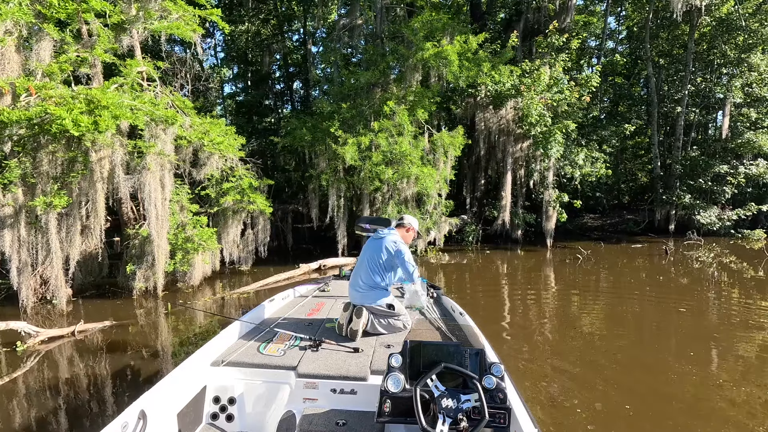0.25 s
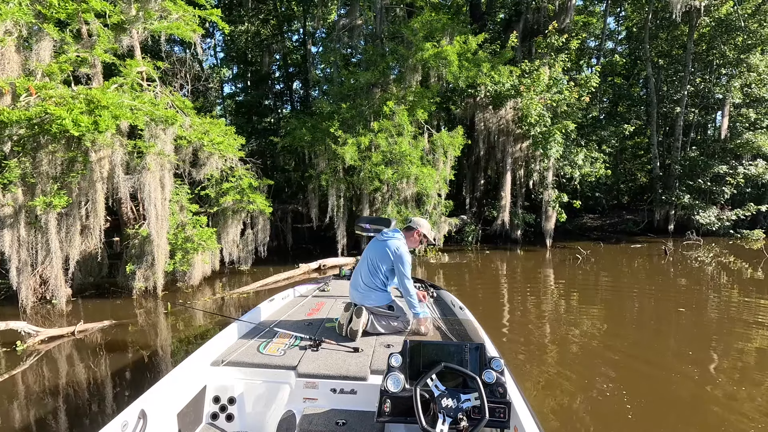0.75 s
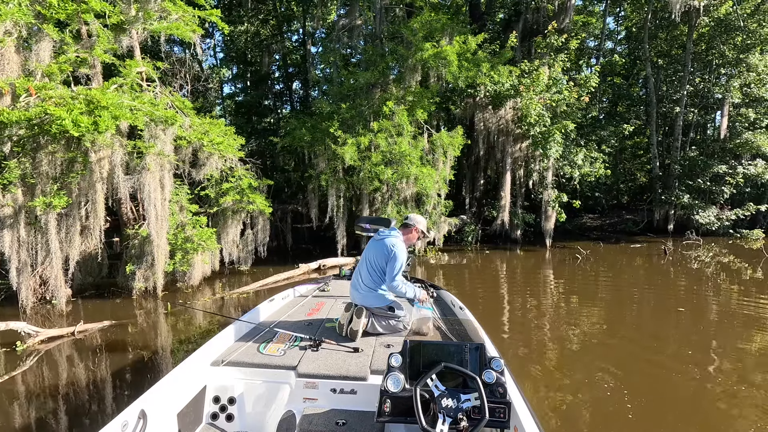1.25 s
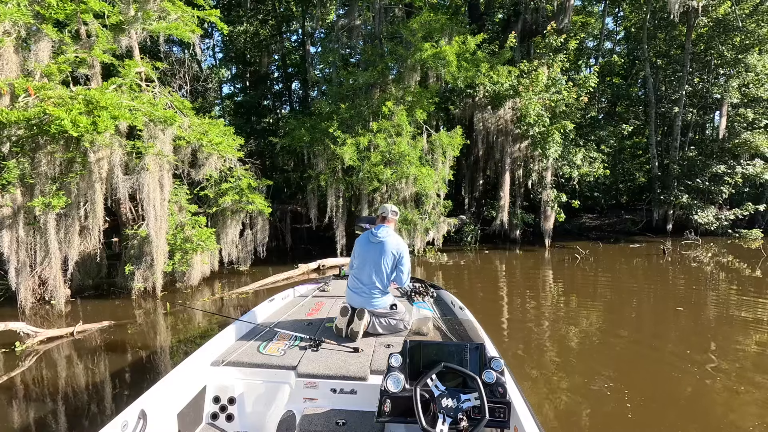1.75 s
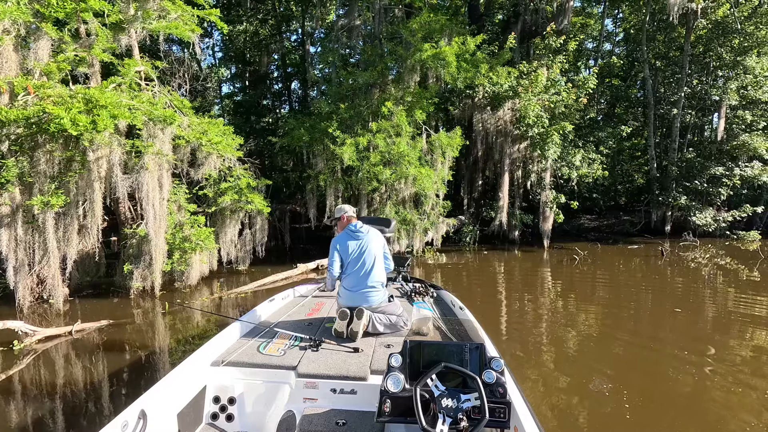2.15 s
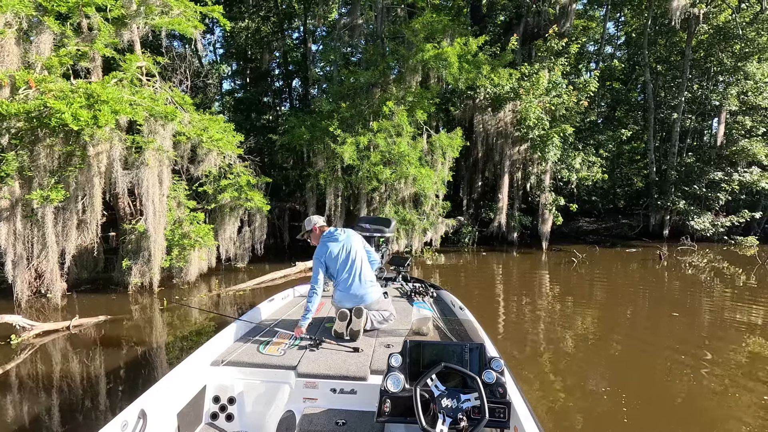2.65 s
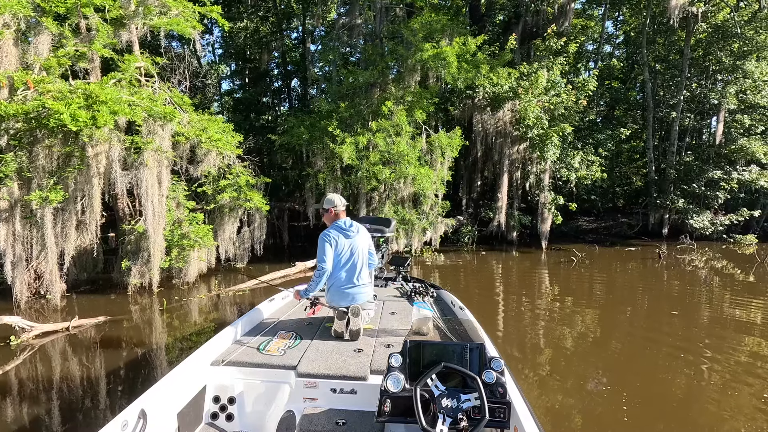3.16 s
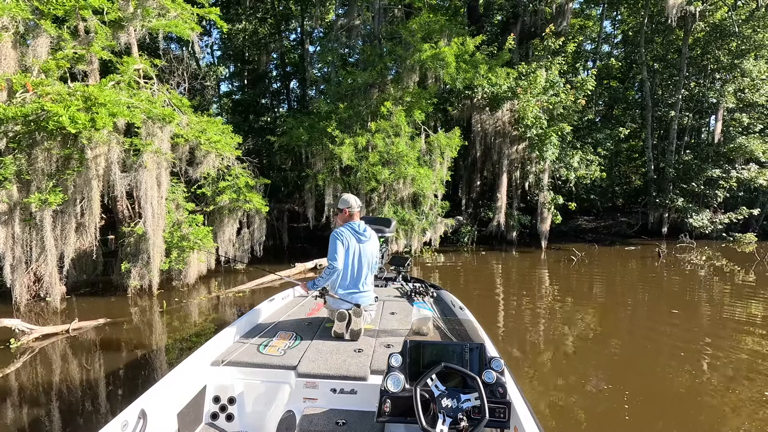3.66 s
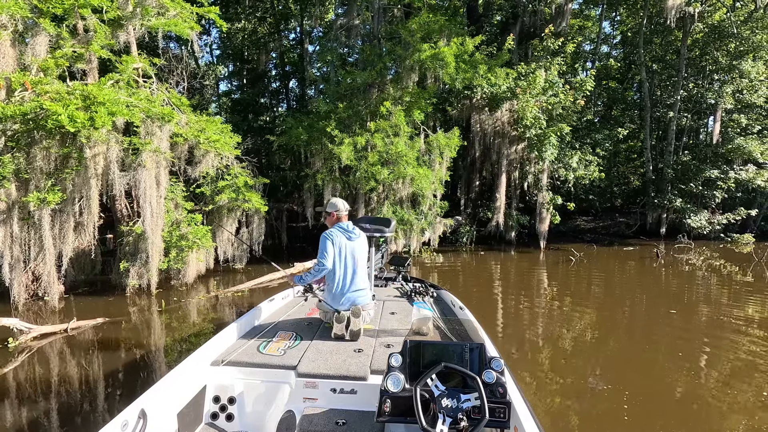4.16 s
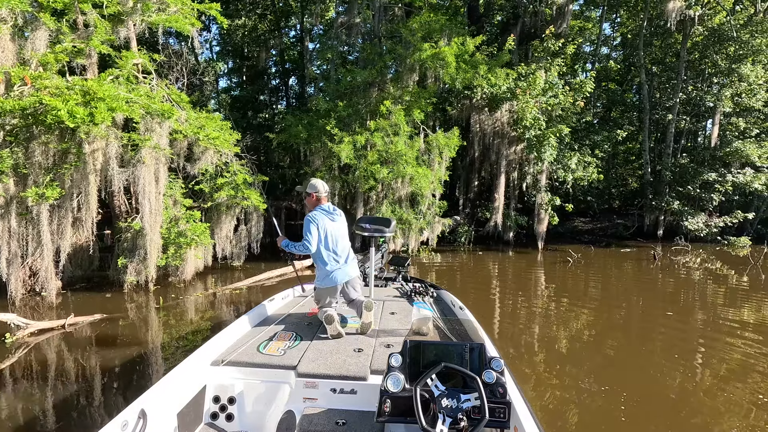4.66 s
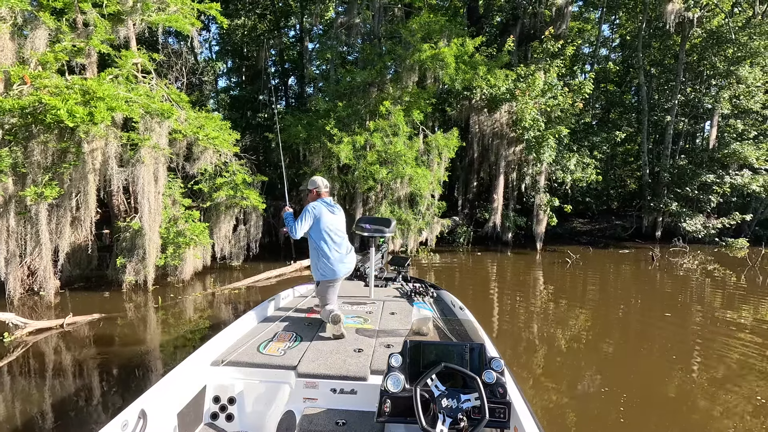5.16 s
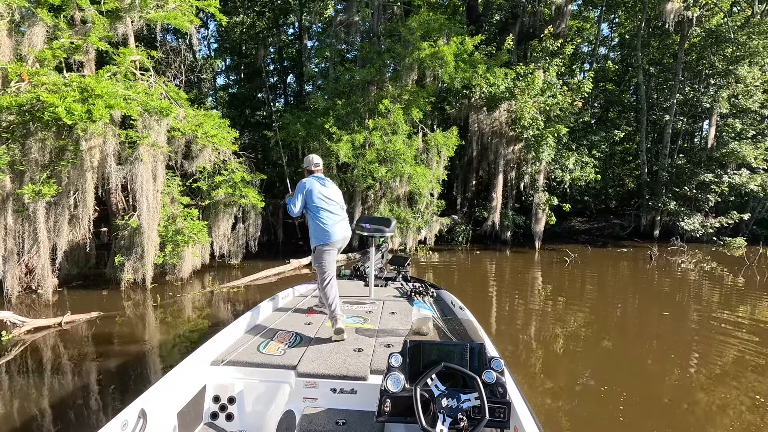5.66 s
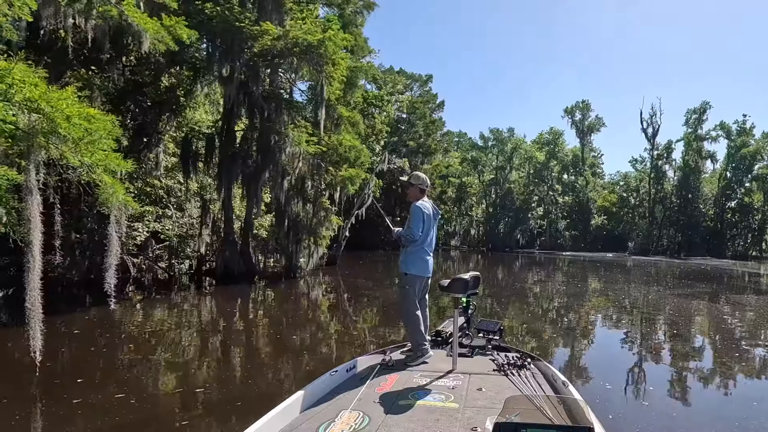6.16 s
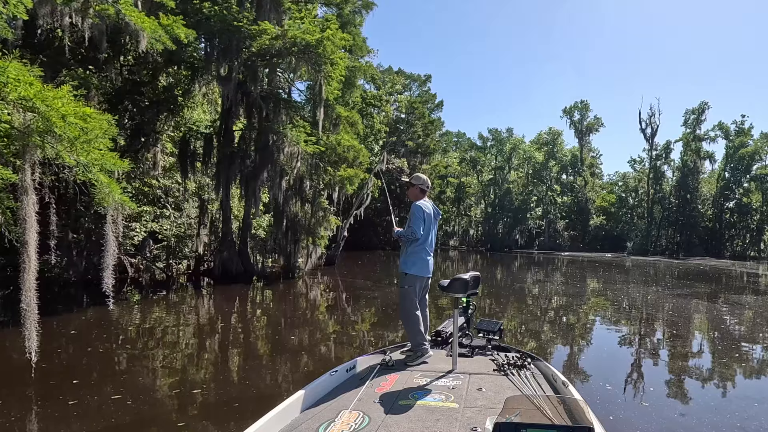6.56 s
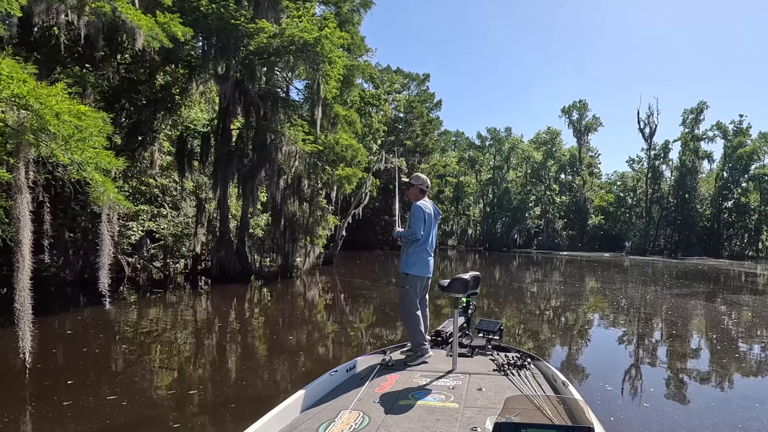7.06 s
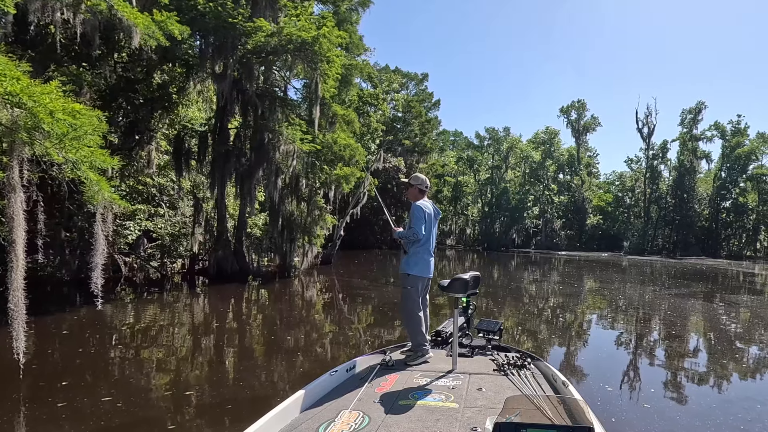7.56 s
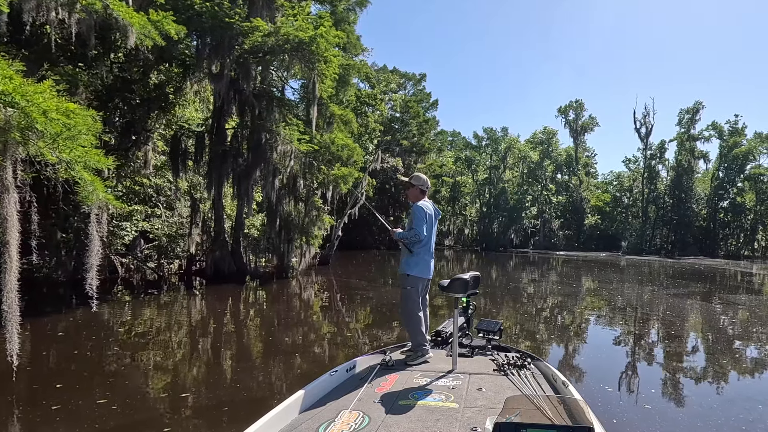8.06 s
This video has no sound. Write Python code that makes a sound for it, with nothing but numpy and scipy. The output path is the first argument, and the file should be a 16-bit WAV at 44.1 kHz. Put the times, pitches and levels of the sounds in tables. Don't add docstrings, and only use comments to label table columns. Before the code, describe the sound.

Birds whistle and trill over a steady insect drone and low wind rumble while cloth and tackle rustle on a boat deck, then one heavy step thuds.

```python
import sys
import numpy as np
from scipy import signal
from scipy.io import wavfile
from scipy.ndimage import uniform_filter1d

SR = 44100
rng = np.random.default_rng(int(sys.argv[2]) if len(sys.argv) > 2 else 0)


def unload_audio(sound):
    columns = np.transpose(np.atleast_2d(sound))
    steps = np.round(np.clip(columns, -1, 1) * 32767)
    wavfile.write(sys.argv[1], SR, steps.astype(np.int16))


def field_ratio(decibels):
    return 10 ** (np.asarray(decibels, dtype=float) / 20)


N = 366912
T = np.arange(N) / SR
CUT_S = 6.2


def rms_one(x):
    return x / np.sqrt(np.mean(x ** 2) + 1e-20)


def in_time(tables):
    s, *columns = np.concatenate(tables).T
    return [np.interp(T, s, column) for column in columns]


def at_hz(points, hz):
    table_hz, db = np.array(points).T
    return np.interp(np.log(hz), np.log(table_hz), db)


def drift(rate):
    r = np.exp(-80 * np.pi * rate / SR)
    white = rng.standard_normal(N // 40 + 2002)
    slow = rms_one(signal.lfilter([1], [1, -2 * r, r * r], white)[2000:])
    return np.interp(np.arange(N) / 40, np.arange(len(slow)), slow)


def band(x, low_hz, high_hz, order=2):
    sos = signal.butter(order, [low_hz, high_hz], "band", fs=SR, output="sos")
    return signal.sosfilt(sos, x)


def ring(clicks, hz, t60):
    r, w = field_ratio(-60 / (t60 * SR)), 2 * np.pi * hz / SR
    return signal.lfilter([0, np.sin(w)], [1, -2 * r * np.cos(w), r * r], clicks + 1e-18)


def pair(mid, side, alike):
    alike = np.clip(alike, 0, 1)
    difference = np.sqrt(1 - alike) * side * np.array([[1], [-1]])
    return (np.sqrt(1 + alike) * mid + difference) / np.sqrt(2)


def pan(x, left_db):
    return x * field_ratio(left_db / 2 * np.array([[1], [-1]]))


def evened(x):
    return rms_one(x / uniform_filter1d(x[0] ** 2, size=5000) ** .35)


# (pitch [Hz], likeness [0 to 1])
SIDE_LIKENESS = [(200, 0.089), (500, 0.12), (1000, 0.17), (2000, 0.21), (4000, 0.93), (8000, 0.68)]
# (pitch [Hz], left over right [dB])
SIDE_LEAN = [(150, -1), (300, -6), (600, -6), (1200, -1.5), (2500, 2), (5000, 2)]


def coloured(white, gains_db, low_hz=180):
    out, edges = 0, low_hz * 2 ** np.arange(0, 6.6, .5)
    for k, (low, high) in enumerate(zip(edges, edges[1:])):
        hz = np.sqrt(low * high)
        noise = pair(*band(white[k % 2], low, high), at_hz(SIDE_LIKENESS, hz))
        out = out + field_ratio(gains_db(hz)) * pan(noise, at_hz(SIDE_LEAN, hz))
    return out


# (pitch [Hz], level per Hz [dB])
SHADE = [(180, -2.5), (260, -15.5), (700, -22), (950, -28), (1200, -17.5), (2100, -28), (3100, -24.5),
         (4500, -27.5), (6200, -25.5), (8500, -37), (10500, -39.5), (12500, -51), (15000, -61.5)]
# (pitch [Hz], level per Hz [dB])
OPEN = [(180, 0), (300, -13.5), (600, -15.5), (950, -21.5), (1200, -12), (1800, -17), (2700, -16),
        (3700, -33), (5300, -13), (6900, -29), (8500, -53), (11000, -59), (15000, -78)]


def air():
    def gains_db(hz):
        shade_db, open_db = -66 + at_hz(SHADE, hz), -72 + at_hz(OPEN, hz)
        return np.where(T < CUT_S, shade_db, open_db) + 2.7 * drift(4.5)
    floor = pan(coloured(rng.standard_normal((2, 2, N)), gains_db) * field_ratio(25.0), -0.68)
    return signal.sosfilt(signal.butter(6, 13500, fs=SR, output="sos"), floor)


# (time [s], level [dB])
INSECT_LEVEL = [
    [(0, -60), (.8, -58.5), (1.66, -58.5)],
    [(2.15, -58), (3, -57.5), (4, -58.5), (4.8, -59.5), (5.45, -56), (5.8, -58.5), (6.19, -57.5)],
    [(6.21, -71.5), (6.6, -72), (7.25, -67.5), (8.32, -68)],
]
# (pitch [Hz], width [Hz], level [dB])
INSECT_MODES = [(4210, 320, -5), (4468, 370, 0.5), (4790, 440, -1.5), (5260, 470, -6), (5950, 350, -22)]


def chorus():
    clicks = (rng.random((2, N)) < 2500 / SR) * rng.standard_normal((2, N))
    out = 0
    for k, (hz, width_hz, db) in enumerate(INSECT_MODES):
        shell = band(np.roll(clicks, 3001 * k, axis=1), hz - width_hz / 2, hz + width_hz / 2)
        out = out + field_ratio(db + 1.0 * drift(4.3)) * rms_one(shell)
    return field_ratio(in_time(INSECT_LEVEL)[0]) * rms_one(pair(*out, 0.58))


# (time [s], level [dB])
WIND = [
    [(0.0, -39.5), (0.018, -57.5), (0.296, -51.5), (0.33, -62.5), (0.496, -52), (0.9, -55), (1.25, -56),
     (1.64, -52.5)],
    [(2.17, -52), (2.9, -52.5), (3.3, -56.5), (4.3, -53), (5.06, -52)],
    [(5.3, -50.5), (5.75, -56.5), (6.5, -52), (7.4, -54), (8.3, -52.5)],
]
# (middle [s], length [s], level over the wind [dB])
PUFFS = [(2.45, .2, -4), (3.053, 0.29, 5), (3.7, 0.13, 5), (3.83, .06, 1), (4.023, 0.11, 6.5),
         (4.762, 0.17, 8.5), (5.92, 0.13, 5), (6.06, .08, -8), (6.249, 0.29, 7), (6.519, .14, 5.5),
         (6.681, 0.19, 6.5), (6.83, 0.11, -8), (7.134, 0.34, 5), (7.456, 0.12, 3), (7.75, 0.13, 3.5)]


def rumble():
    gust_db = in_time(WIND)[0] + 52.5
    for s, length, db in PUFFS:
        gust_db += db * np.cos(np.pi * np.clip((T - s) / length, -.5, .5)) ** 2
    white = rng.standard_normal((4, N))
    deep = evened(band(white[:2], 30, 78.0))
    deep = deep * field_ratio(-50.5 + gust_db + 1.0 * drift(6))
    upper = evened(band(band(white[2:], 87, 170.0), 56, 240))
    upper = upper * field_ratio(-59 + 0.3 * gust_db + 2.2 * drift(5.0))
    return pair(*deep, .985) + pair(*upper, 0.87)


# (start [s], length [s], level [dB], extra level of the bright top [dB])
RUBS = [(-.06, 0.18, -52, -22), (0.094, 0.098, -52.5, -26), (0.168, .11, -56, -25), (0.238, 0.27, -66, -38),
        (.5, 0.28, -69, -39.5), (0.34, 0.058, -67.5, -31), (0.47, 0.079, -55.5, -19),
        (0.542, 0.12, -63.5, -26), (.76, .36, -73, -45), (0.769, 0.045, -64, -27),
        (1.069, 0.08, -64.5, -43), (1.144, 0.073, -59.5, -40), (1.201, 0.11, -65, -40),
        (1.34, 0.057, -69, -48), (2.482, 0.25, -66.5, -31), (3.555, 0.26, -65, -33),
        (4.568, 0.051, -67, -31), (4.665, 0.064, -51.5, -6), (4.725, 0.024, -53.5, -16),
        (4.994, 0.11, -72, -47), (5.093, 0.024, -68, -55), (5.828, 0.068, -69, -27)]
# (pitch [Hz], level per Hz [dB])
RUB_COLOUR = [(250, 1), (500, -2.5), (800, -7.5), (1400, 2), (2500, -2.5), (4000, -3.5), (7000, -16),
              (10000, -45), (15000, -67.5)]


def rustle():
    dull, bright = np.zeros((2, N))
    for s, length, db, bright_db in RUBS:
        at = np.arange(max(round(s * SR), 0), round((s + length) * SR))
        stroke = np.abs(np.sin(np.pi * (T[at] - s) / length)) ** .8
        dull[at] += field_ratio(db) * stroke
        bright[at] += field_ratio(db + bright_db) * stroke
    fade = np.exp(-1 / (0.0021 * SR))
    dull, bright = signal.lfilter([1 - fade], [1, -fade], np.array([dull, bright]) + 1e-18)
    grains = rng.standard_normal((2, 2, N)) * field_ratio(2.5 * drift(230) + 1.4 * drift(35))
    grains[:, 1] *= .35
    body = coloured(grains, lambda hz: at_hz(RUB_COLOUR, hz))
    top = pair(*band(grains[:, 0], 4900, 9500), .75) * field_ratio(-2.5)
    return pan(body * field_ratio(11.5) * dull + top * bright, -1.5)


# (time [s], peak of the dull part [dB], peak of the bright part [dB])
TICKS = [(0.0168, -50, -68), (0.0263, -51, -58), (0.052, -55.5, -71.5), (0.1483, -34.5, -73.5),
         (0.2136, -53, -61), (0.2323, -40, -76), (0.358, -58, -70), (0.407, -63, -65), (0.4453, -57, -82),
         (0.4977, -66.5, -61.5), (0.5284, -55.5, -52), (0.5733, -53.5, -60.5), (0.598, -52, -67.5),
         (0.7634, -55.5, -60.5), (0.7955, -49, -70.5), (0.9712, -57.5, -83), (1.097, -62, -85),
         (1.24, -50, -96), (1.3094, -70, -99), (2.2282, -46.5, -76), (2.967, -53, -89), (3.706, -59, -86),
         (4.679, -66, -65), (4.7363, -52, -75), (5.0988, -49, -91), (5.121, -49.5, -92),
         (5.266, -64.5, -88), (5.653, -57, -103), (5.8844, -78, -75), (4.4465, -75, -81),
         (4.7795, -77, -79), (4.8414, -75, -79), (4.868, -78, -79), (5.1971, -74, -83), (5.9055, -75, -79)]
# (pitch [Hz], level [dB], time to die by 60 dB [s])
TICK_MODES = [(616, -7.5, 0.0091), (1280, -4.5, 0.026), (1660, 8.5, 0.0041), (2300, -5.5, .01),
              (3360, -2, 0.015)]


def ticks():
    s, dull_db, bright_db = np.transpose(TICKS)
    at, out = (s * SR).astype(int), np.zeros(N)
    chance = rng.normal(0, 3.5, (len(at), len(TICK_MODES)))
    for k, (hz, db, t60) in enumerate(TICK_MODES):
        clicks = np.zeros(N)
        clicks[at] = field_ratio(dull_db + db - 10.0 + chance[:, k])
        out += ring(clicks, hz, t60)
    cracks = np.zeros(N)
    cracks[at] = field_ratio(bright_db + 21.5)
    fading = signal.lfilter([1], [1, -field_ratio(-60 / (0.0065 * SR))], cracks + 1e-18)
    return pan(out + band(fading * rng.standard_normal(N), 4000, 9500), -1.79)


# (time [s], peak [dB], pitch [Hz])
CRACKLES = [(0.017, -42, 1600), (0.024, -33.5, 1840), (0.043, -35, 3200), (0.051, -40, 1560),
            (0.058, -43, 2030), (0.109, -46, 1290), (0.151, -45, 3200), (0.148, -36, 1390),
            (0.232, -40, 2170), (0.324, -47, 2320), (0.355, -46, 1620), (.357, -40, 2300),
            (.408, -45, 2300), (.408, -45, 5200), (1.098, -41, 3000), (1.241, -40.5, 2800),
            (.971, -45, 2300), (.795, -43, 3100), (0.378, -43, 2570), (0.406, -37, 3610),
            (0.443, -52, 1340), (0.473, -42, 2360), (0.496, -36, 2600), (0.527, -33, 2560),
            (.51, -42, 3600), (.535, -43, 1800), (1.182, -46, 1500), (1.255, -47, 1700), (0.592, -34, 3740),
            (4.031, -49.5, 594), (4.469, -57, 3350)]


def crackles():
    out, age = np.zeros(N), np.arange(900) / SR
    for s, db, hz in CRACKLES:
        fall_db = 60 * age * hz / 13
        out[round(s * SR):][:900] += field_ratio(db - 4 - fall_db) * np.sin(2 * np.pi * hz * age)
    return pan(out, -1.8)


# (time [s], level [dB])
STEP = [
    (5.097, -41),
    (5.112, -32.5),
    (5.14, -38.5),
]
# (pitch [Hz], level [dB], time to die by 60 dB [s])
HULL_MODES = [(43.6, 4.5, 0.47), (69.3, 0, 0.24), (110.2, -12, 0.99), (131.6, -0.5, 0.18),
              (190.2, -2.5, 0.22), (260, -35, 0.12)]


def step():
    push = np.zeros(N)
    for s, db in STEP:
        push[round(s * SR)] = -field_ratio(db)
    push = uniform_filter1d(push, size=90, origin=-44)
    return sum(field_ratio(db) * ring(push, hz, t60) for hz, db, t60 in HULL_MODES)


def forest(send):
    t60_s, path_count = 0.85, 4
    sway_s = .045
    age, white, out = np.arange(SR) / SR, rng.standard_normal((2, SR)), 0
    dying = field_ratio(-60 * age / t60_s) + 1.2 * field_ratio(-60 * age / 0.057)
    shape = (1 - np.exp(-age / 0.0045)) * dying
    for k in range(path_count):
        paths = np.roll(white, SR // path_count * k, axis=1)
        tail = rms_one(pair(*paths, 0.73) * shape) / np.sqrt(SR)
        turn = (T / sway_s + k) % path_count - path_count / 2
        part = send * np.cos(np.pi / 2 * np.clip(turn, -1, 1))
        for shot in (T < CUT_S, T >= CUT_S):
            out = out + signal.oaconvolve((part * shot)[None], tail)[:, :N] * shot
    return out


# (start [s], echo level [dB], direct level [dB])
HIGH_BUZZES = [
    (.649, -53, -45),
    (2.987, -54, -63),
    (6.071, -47.5, -60),
]
# (start [s], echo level [dB], direct level [dB])
LOW_BUZZES = [
    (2.403, -52, -74),
    (5.0, -53.5, -72),
    (5.373, -52.5, -75),
]
# (length [s], from [Hz], to [Hz])
HIGH_BUZZ, LOW_BUZZ = (.119, 6000, 7800), (0.11, 3200, 4130)


def buzzes():
    pulses_per_s = 119
    direct, send = np.zeros(N), np.zeros(N)
    uneven = .2 * drift(40)
    for (length, from_hz, to_hz), rows in ((HIGH_BUZZ, HIGH_BUZZES), (LOW_BUZZ, LOW_BUZZES)):
        for start, echo_db, direct_db in rows:
            at = round(start * SR) + np.arange(round(length * SR))
            u = ((T[at] - start) * pulses_per_s + uneven[at]) % 1
            hz = from_hz + (to_hz - from_hz) * u
            tone = np.sin(2 * np.pi * np.cumsum(hz) / SR) * np.sin(np.pi * u ** 1.26) ** 2
            direct[at] += field_ratio(direct_db) * tone
            send[at] += field_ratio(echo_db) * tone
    return pan(direct * field_ratio(1.7 * drift(60)), -1.9), send


# (time [s], notes per second [1/s], top pitch [Hz], peak [dB])
FAR_TRILL = [
    (2.0, 17.2, 5440, -55),
    (2.3, 18.2, 6680, -50.5),
    (2.5, 18.6, 7780, -51),
    (2.84, 21, 7880, -62.5),
]
# (time [s], notes per second [1/s], top pitch [Hz], peak [dB])
NEAR_TRILL = [
    (6.489, 17.9, 5330, -65.5),
    (6.9, 17.7, 5780, -58),
    (7.25, 18.6, 6500, -54),
    (7.6, 18.7, 7170, -52),
    (8.04, 18.3, 7740, -56.5),
]


def trill(rows, direct_db):
    per_s, top_hz, db = in_time([rows])
    bottom_hz = np.maximum(.67 * top_hz, 4374)
    on = (T >= rows[0][0]) & (T < rows[-1][0])
    u = np.cumsum(per_s * on) / SR % 1
    dive = np.clip((u - .68) / 0.23, 0, 1)
    throb = np.cos(2 * np.pi * 6.0 * u + .7 * drift(29.77))
    hz = top_hz - 350 + 300 * throb * (dive == 0) - (top_hz - bottom_hz) * dive + 230 * drift(199.8)
    level = np.interp(u, [0, .3, .4, .6, .7, .8, .87, .93], [0, 0, 0.35, 0.9, 0.53, 1.63, 0.5, 0])
    level = level * (1 + 0.29 * throb)
    song = on * field_ratio(db + 2.0 * drift(200)) * level * np.sin(2 * np.pi * np.cumsum(hz) / SR)
    song += field_ratio(-6.5) * np.roll(song, round(.0055 * SR))
    return pan(field_ratio(direct_db) * song, -0.91), song


def sung(motif, times):
    out = []
    for s, more_db, tempo, ratio in times:
        for late, length, from_hz, to_hz, db in motif:
            out.append((s + tempo * late, tempo * length, ratio * from_hz, ratio * to_hz, db + more_db))
    return out


def repeated(run, count):
    s, period, step_db, ratio = run
    return [(s + k * period, k * step_db, 1, ratio ** k) for k in range(count)]


# (time after start [s], length [s], from [Hz], to [Hz], peak [dB])
WARBLE = [
    (-.128, 0.012, 6720, 7730, -63.5),
    (-.036, 0.0065, 6530, 9060, -63),
    (-.027, 0.013, 8500, 7320, -59),
    (0.0, .026, 7510, 6160, -43.5),
]
CHIP = [
    (0.0, .014, 6500, 7180, -56.5),
    (.009, .03, 6990, 7440, -52.5),
]
LILT = [
    (-.07, .08, 2760, 2250, -67),
    (0.0, .03, 2450, 3120, -63),
    (.028, 0.06, 3140, 3270, -68),
    (.085, .035, 3000, 2450, -59.5),
    (.135, .08, 2735, 2193, -64.5),
]
SWOOP = [
    (0.005, .04, 2633, 2206, -66),
    (.04, 0.09, 2205, 2287, -73),
]
HOLD = [
    (0.0, .05, 2953, 3000, -62.5),
    (.045, .03, 3154, 3550, -65),
    (.085, .06, 2720, 2760, -67.5),
]
DUET_LOW = [
    (0.0, 0.012, 5430, 5920, -64),
    (.008, 0.035, 5894, 5950, -54),
]
DUET_TOP = [
    (0.0, .012, 6290, 7830, -66),
    (.008, 0.036, 7830, 7800, -57),
    (.04, .012, 7800, 6800, -66),
    (.056, .03, 7840, 7850, -65.5),
]
# (time [s], level [dB], time stretch [ratio], pitch [ratio])
WARBLES, CHIPS, LILTS = [(0.518, -0.5, 0.94, 0.98), (2.856, -8, 1.02, 1.01), (5.929, -6, 1.05, 1.005)], [(0.1, -0.6, 0.99, 0.97), (2.447, 0, 1, 1.045),
                                          (4.527, -0.5, .8, 1.017), (5.81, -8.5, 0.67, 1.06),
                                          (5.658, -16.5, 1.1, 1.05)], [(6.925, -2.5, 1.01, 1.001),
                                                         (7.28, -1.5, 0.88, .99)]
# (first [s], period [s], level per repeat [dB], pitch per repeat [ratio])
SWOOP_RUN, HOLD_RUN = (2.352, .3145, 1.4, 1.001), (2.463, .3115, 1.65, 1.001)
DUET_LOW_RUN, DUET_TOP_RUN = (1.145, .1032, -1.2, .978), (1.141, .1025, -0.31, .981)
DUET_ACCENT_DB = [-4.5, 3.5, 3.5, 3, 2]
# (start [s], length [s], from [Hz], to [Hz], peak [dB])
HIGH_CALLS, LOW_CALLS = [(2.15, 0.11, 6630, 6830, -63), (2.195, 0.14, 7970, 7670, -71),
                         (2.55, 0.04, 7960, 7730, -69), (2.645, 0.05, 6720, 6800, -63.5),
                         (2.689, 0.075, 7700, 7630, -60.5), (3.402, .008, 7100, 8100, -68),
                         (3.165, 0.011, 6260, 8600, -66), (3.56, 0.027, 3980, 4880, -59),
                         (3.59, .03, 7830, 7090, -61), (3.928, .015, 6400, 7400, -68),
                         (3.658, 0.048, 7590, 6260, -49), (3.974, 0.087, 8960, 6720, -60),
                         (3.975, 0.024, 9860, 8350, -66), (3.997, 0.043, 8800, 7680, -64),
                         (1.6, 0.028, 6800, 6300, -62), (1.445, 0.018, 6200, 7260, -58),
                         (5.058, 0.05, 7150, 7880, -61.5), (5.096, 0.046, 8020, 6110, -58.5),
                         (1.04, 0.028, 7700, 7700, -76), (6.245, .025, 7800, 7100, -68),
                         (6.262, 0.2, 7100, 6590, -66.5), (6.953, 0.0063, 7300, 5730, -47.5),
                         (6.955, 0.021, 5590, 5960, -49), (8.041, 0.049, 7320, 6150, -56),
                         (8.072, 0.034, 6280, 6020, -57), (8.1, 0.025, 6100, 8170, -53),
                         (8.263, 0.04, 4200, 4960, -65.5)], [(2.1, 0.076, 3400, 3800, -58), (3.3, 0.045, 3300, 2900, -57),
                                             (3.53, .05, 2400, 2500, -65.5),
                                             (3.735, 0.0292, 2950, 1800, -62),
                                             (3.33, .03, 2900, 3000, -55.5), (8.26, .05, 2650, 2500, -75),
                                             (7.43, .1, 2800, 2050, -72), (7.13, 0.062, 2300, 1800, -69),
                                             (5.009, 0.079, 4200, 3300, -67),
                                             (5.4, 0.072, 3795, 2900, -62.5),
                                             (6.225, 0.041, 3000, 3250, -75.5),
                                             (6.336, 0.055, 2750, 2560, -73.5),
                                             (7.275, .025, 2600, 2480, -62.5)]


def forest_notes():
    accents = np.outer(DUET_ACCENT_DB, [0, 1, 0, 0])
    duet_times = np.add(repeated(DUET_LOW_RUN, count=5), accents)
    motifs = sung(WARBLE, WARBLES) + sung(CHIP, CHIPS) + sung(LILT, LILTS)
    runs = sung(SWOOP, repeated(SWOOP_RUN, count=5)) + sung(HOLD, repeated(HOLD_RUN, count=4))
    duet = sung(DUET_LOW, duet_times) + sung(DUET_TOP, repeated(DUET_TOP_RUN, count=5))
    return motifs + runs + duet + HIGH_CALLS + LOW_CALLS


# (start [s], length [s], from [Hz], to [Hz], peak [dB])
CLOSE_CALLS = [(.935, 0.061, 3050, 3080, -59.5), (.97, 0.066, 3050, 2870, -61),
               (5.995, 0.018, 4800, 3680, -55.5), (2.168, 0.021, 2300, 2350, -64),
               (2.187, 0.015, 2310, 3000, -58), (2.2, 0.018, 3040, 3240, -47.5),
               (3.202, .012, 5880, 4850, -50.5), (3.22, 0.011, 4500, 3850, -59),
               (3.803, 0.021, 3250, 2950, -51), (3.826, 0.017, 2930, 3500, -53),
               (3.846, 0.016, 3500, 3900, -53), (3.862, 0.017, 3800, 4140, -58),
               (3.77, .012, 4000, 3680, -60.5), (3.846, .01, 3410, 2970, -63),
               (3.876, 0.012, 2880, 3380, -55.5), (3.89, 0.017, 4030, 3530, -52),
               (6.505, 0.027, 3300, 3600, -77), (6.76, .035, 3730, 3780, -68.5),
               (6.805, 0.021, 3730, 3730, -66), (6.84, .04, 3730, 3700, -69), (6.9, .04, 3730, 3730, -71),
               (6.53, 0.23, 3700, 3740, -56)]
# (time after start [s], length [s], from [Hz], to [Hz], peak [dB])
TAG = [
    (.003, 0.0059, 6300, 7900, -44.5),
    (.012, 0.0082, 8650, 7840, -57),
    (.046, 0.0077, 5990, 4890, -47.5),
    (.065, .008, 4385, 3860, -58.5),
]
WARBLE_END = [
    (.056, .007, 5950, 5000, -39),
    (.072, 0.008, 4340, 3800, -55),
]
DIVE = [
    (0.0, 0.0139, 4395, 3050, -57),
    (.012, 0.018, 3140, 2883, -60),
]
# (time [s], level [dB], time stretch [ratio], pitch [ratio])
TAGS, EARLY_DIVES = [(.81, -0.5, 1.001, 1.001)], [(2.793, -6, 0.95, 1.02), (2.912, 5, 0.75, 1.04), (3.031, -11, 0.89, 1.2)]
# (first [s], period [s], level per repeat [dB], pitch per repeat [ratio])
DIVE_RUN = (3.084, .0711, 0.58, 1.001)


def close_notes():
    dives = sung(DIVE, repeated(DIVE_RUN, count=11) + EARLY_DIVES)
    return CLOSE_CALLS + sung(TAG, TAGS) + sung(WARBLE_END, WARBLES) + dives


def whistles():
    direct, send = np.zeros((2, N)), np.zeros(N)
    waver, flutter = drift(70), field_ratio(3.5 * drift(120))
    notes = [(note, 0) for note in forest_notes()] + [(note, -6) for note in close_notes()]
    for (s, length, from_hz, to_hz, db), drier_db in notes:
        left_db, direct_db, echo_db = -2.5, 1.5, 0.5
        if (from_hz + to_hz) / 2 < 3900:
            left_db, direct_db, echo_db = 11, -3, 3
        at = round(s * SR) + np.arange(round(length * SR))
        at = at[at < N]
        u = np.linspace(0, 1, len(at), endpoint=False)
        glide = (to_hz - from_hz) * (u + .06 * waver[at])
        wobble_hz = 110 * np.exp(-length / .1) * from_hz / 7000
        hz = from_hz + glide + wobble_hz * waver[at - 999]
        swell = field_ratio(db) * np.sin(np.pi * u) ** .5 * flutter[at]
        note = swell * np.sin(2 * np.pi * np.cumsum(hz) / SR)
        direct[:, at] += pan(field_ratio(direct_db) * note, left_db)
        send[at] += field_ratio(echo_db + drier_db - 23 * length) * note
    return direct, send


def scene():
    voices = whistles(), buzzes(), trill(FAR_TRILL, direct_db=-14), trill(NEAR_TRILL, direct_db=-0.5)
    echo = forest(sum(send for direct, send in voices))
    birds = sum(direct for direct, send in voices) + echo
    return birds + chorus() + rumble() + air() + rustle() + ticks() + crackles() + step()


# (from [s], top [Hz])
TREBLE_LIMIT = [(0, 14100), (.28, 11200), (.47, 15000), (.61, 11800), (.655, 8300), (.77, 12700),
                (.82, 11000), (1.15, 8200), (1.54, 11100), (2.375, 8300), (2.42, 9000), (2.49, 8250),
                (2.585, 12400), (2.67, 8250), (2.82, 10200), (2.86, 9000), (2.915, 10800), (2.95, 11500),
                (3.01, 9800), (3.035, 8400), (3.1, 11000), (4.0, 9700), (4.11, 11300), (4.35, 12300),
                (4.55, 11100), (4.65, 14200), (4.745, 12600), (5.0, 11300), (5.105, 8400), (5.135, 11200),
                (5.58, 12300), (5.91, 10800), (6.095, 8200), (6.185, 10500), (6.26, 7800), (6.39, 7500),
                (6.51, 10500), (7.0, 8500), (7.14, 8000), (7.2, 8300), (7.255, 7800), (7.31, 7300),
                (7.365, 8000), (7.405, 7400), (7.465, 8200), (7.54, 7650), (7.69, 8000), (7.81, 8300),
                (8.11, 8700), (8.235, 11000)]


def treble_limited(x):
    hz, s, frames = signal.stft(x, SR, nperseg=1024, noverlap=768)
    since, top_hz = np.transpose(TREBLE_LIMIT)
    kept = hz[:, None] < top_hz[np.searchsorted(since, s, side="right") - 1]
    return signal.istft(frames * kept, SR, nperseg=1024, noverlap=768)[1][:, :N]


def band_limit(x):
    return signal.sosfilt(signal.butter(12, 14100, fs=SR, output="sos"), x)


def record(dry):
    heard = (T < 1.6646) | (T >= 2.1537)
    return band_limit(treble_limited(dry) * heard)


dry = scene()
out = record(dry)
unload_audio(out)
```